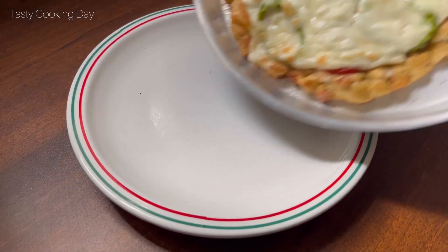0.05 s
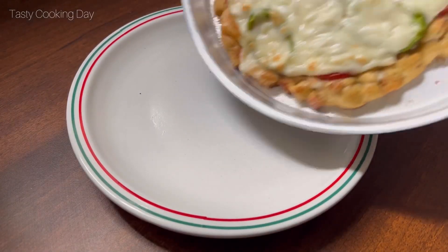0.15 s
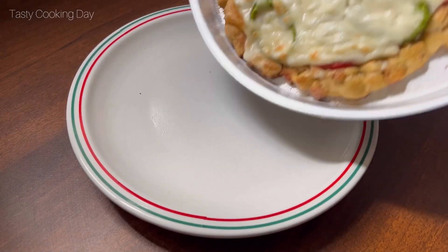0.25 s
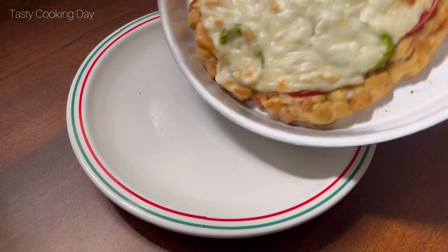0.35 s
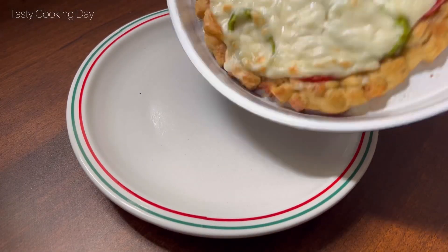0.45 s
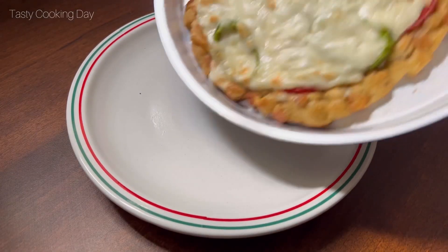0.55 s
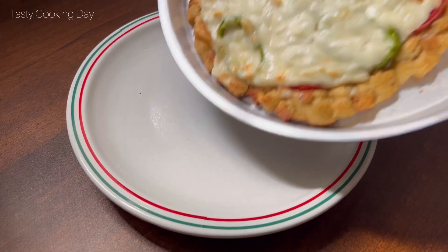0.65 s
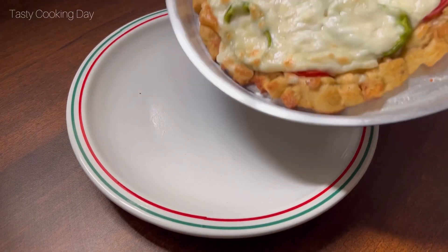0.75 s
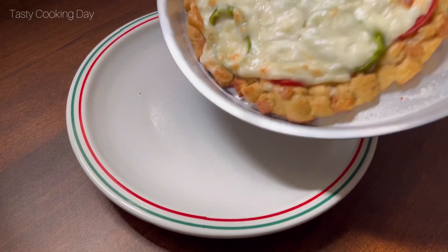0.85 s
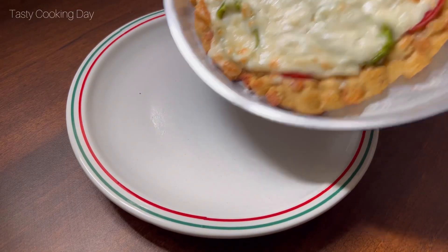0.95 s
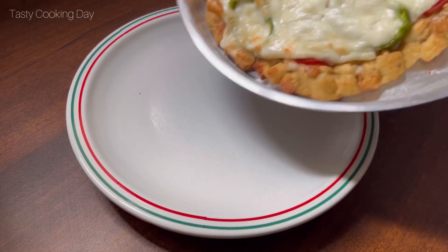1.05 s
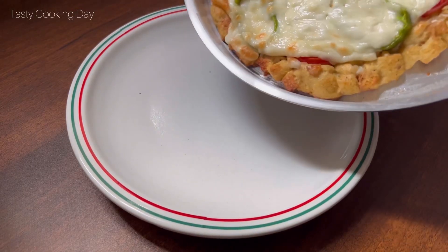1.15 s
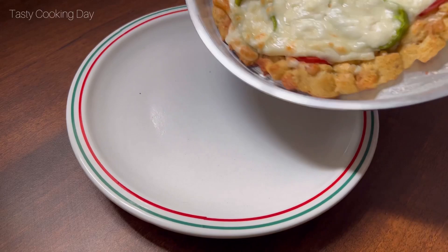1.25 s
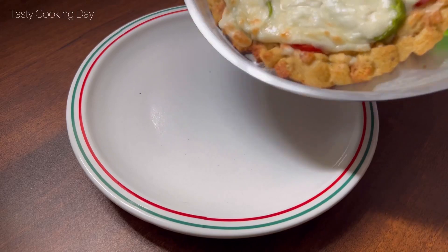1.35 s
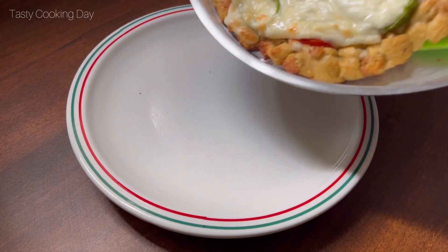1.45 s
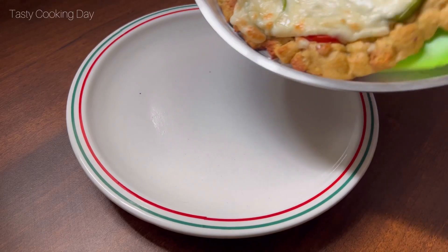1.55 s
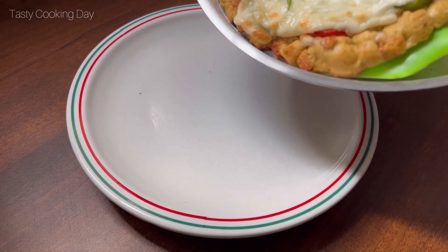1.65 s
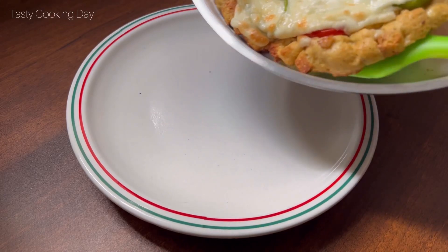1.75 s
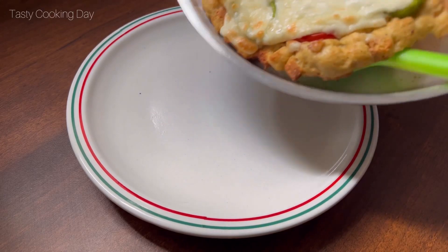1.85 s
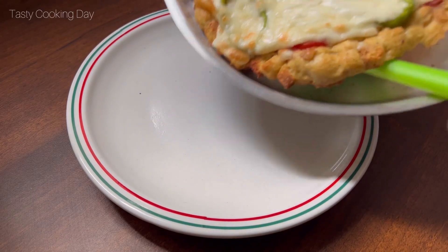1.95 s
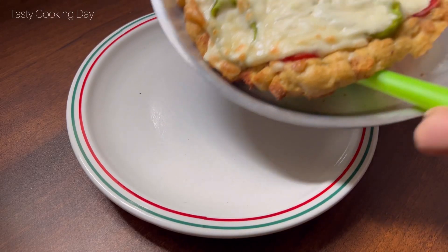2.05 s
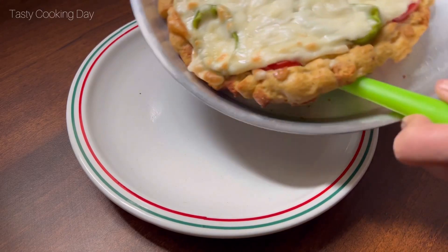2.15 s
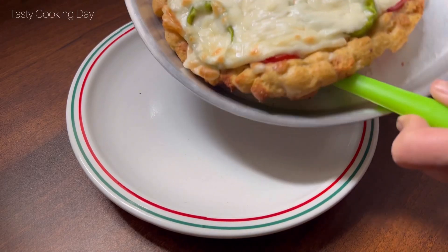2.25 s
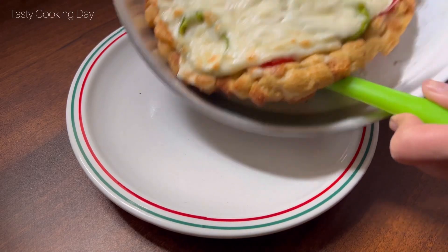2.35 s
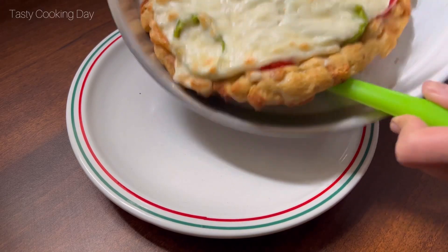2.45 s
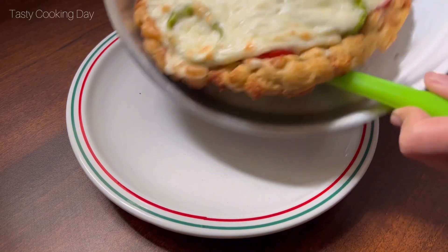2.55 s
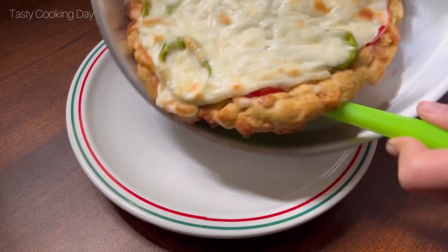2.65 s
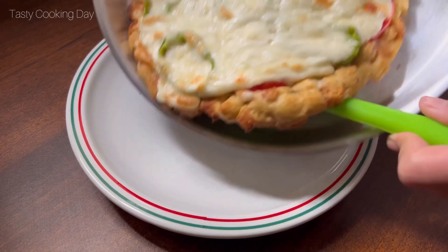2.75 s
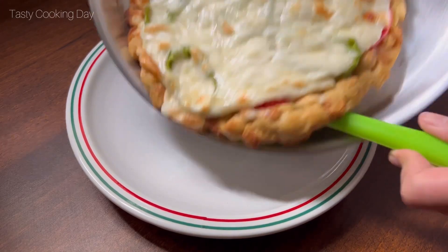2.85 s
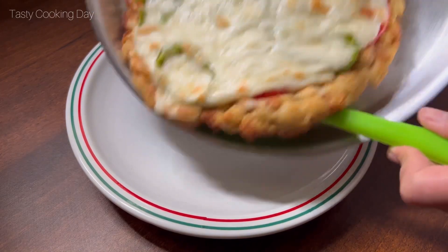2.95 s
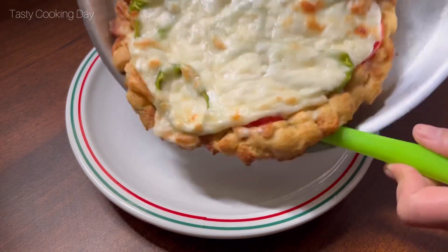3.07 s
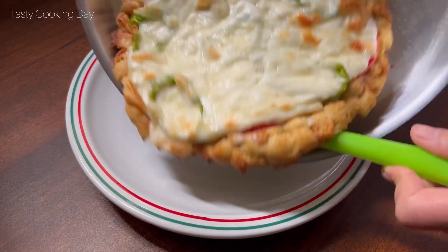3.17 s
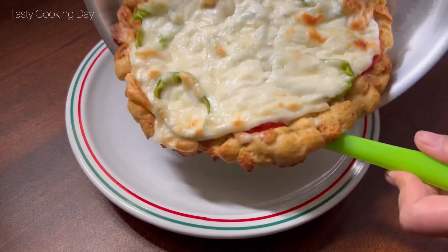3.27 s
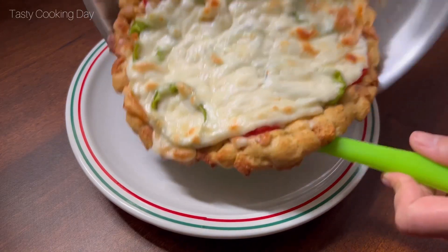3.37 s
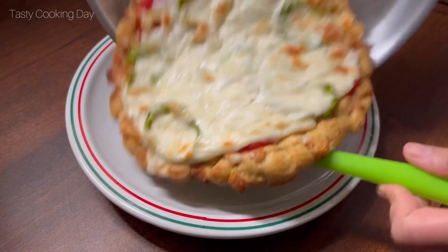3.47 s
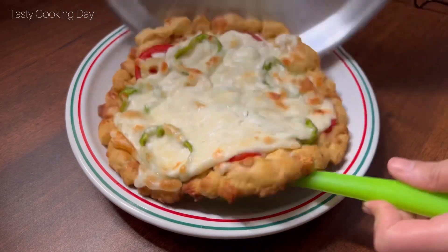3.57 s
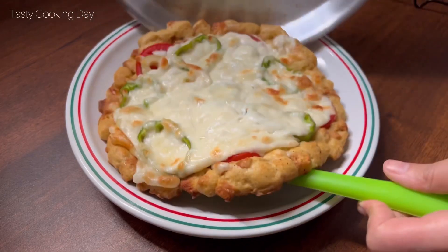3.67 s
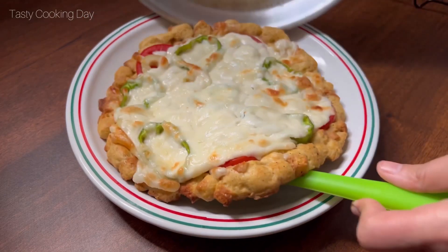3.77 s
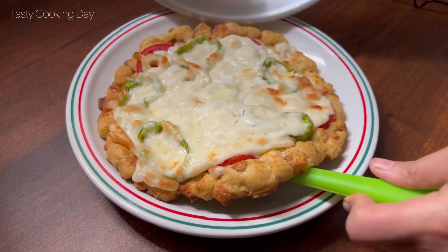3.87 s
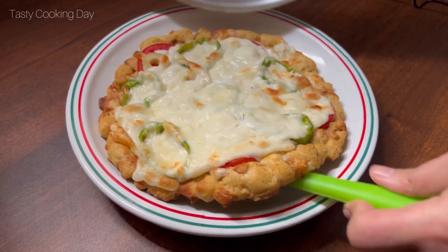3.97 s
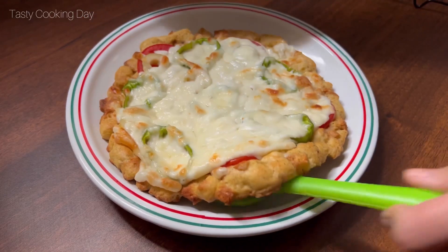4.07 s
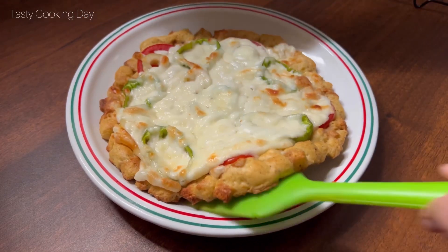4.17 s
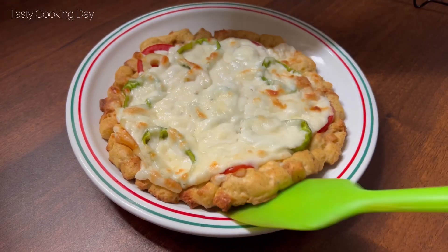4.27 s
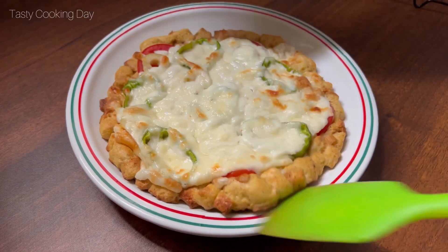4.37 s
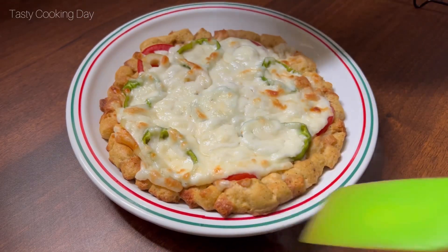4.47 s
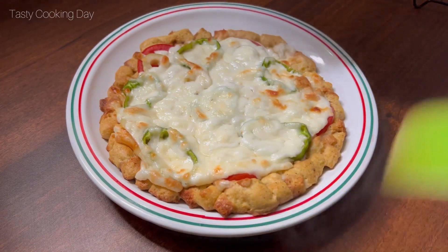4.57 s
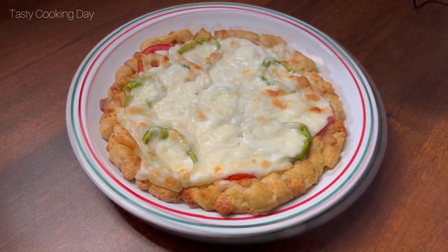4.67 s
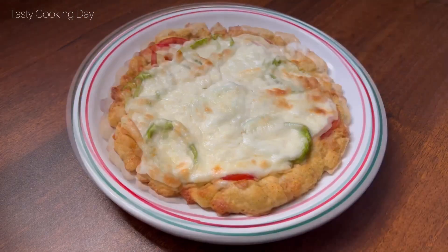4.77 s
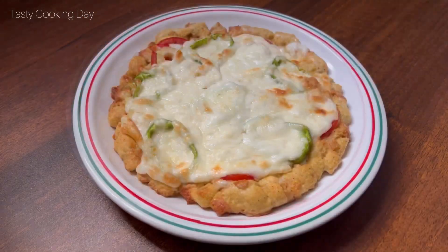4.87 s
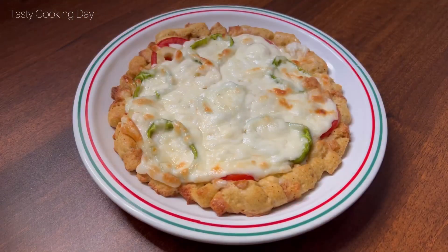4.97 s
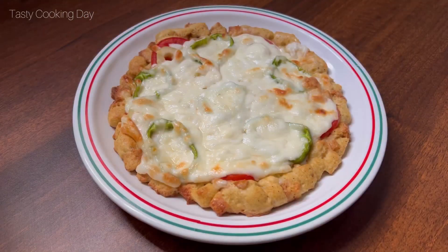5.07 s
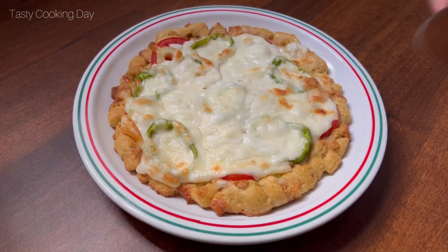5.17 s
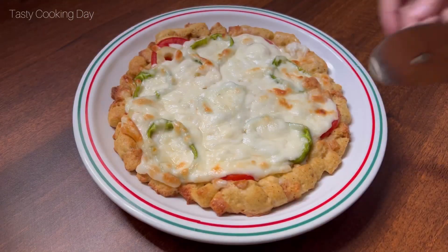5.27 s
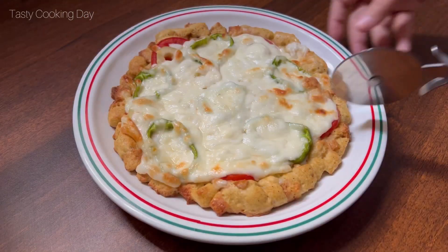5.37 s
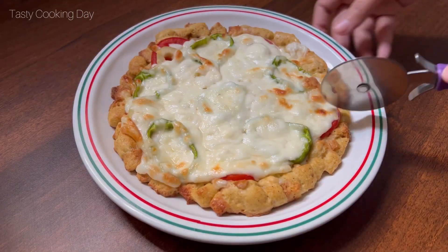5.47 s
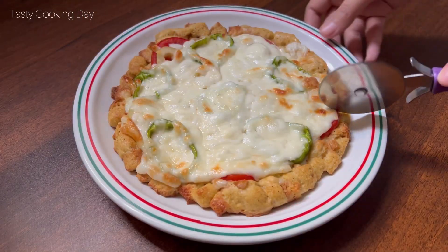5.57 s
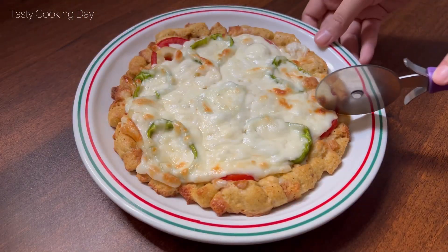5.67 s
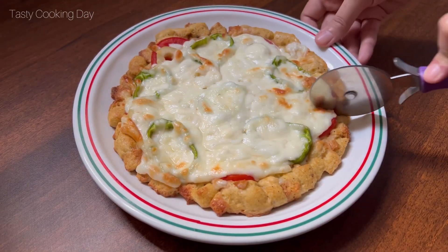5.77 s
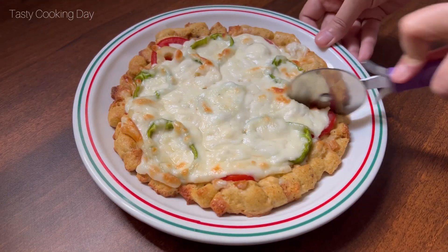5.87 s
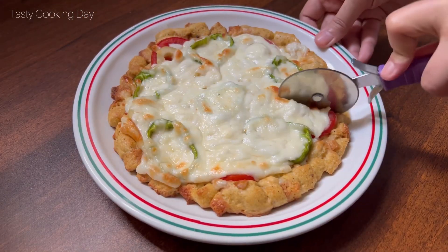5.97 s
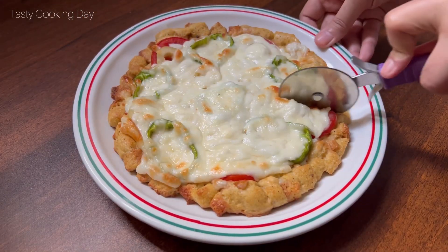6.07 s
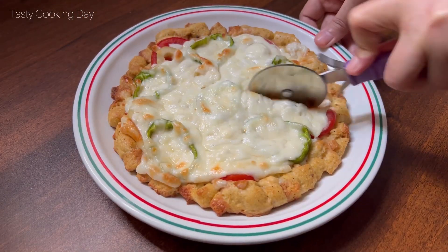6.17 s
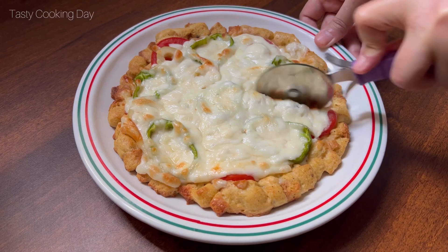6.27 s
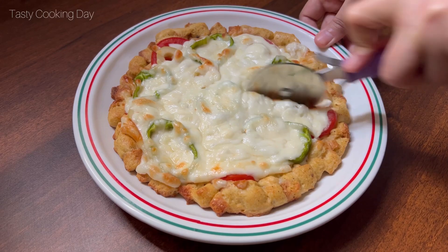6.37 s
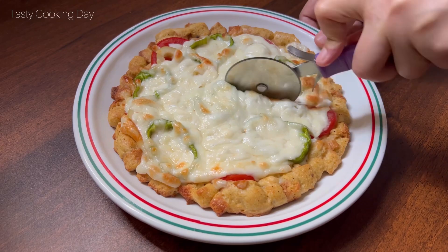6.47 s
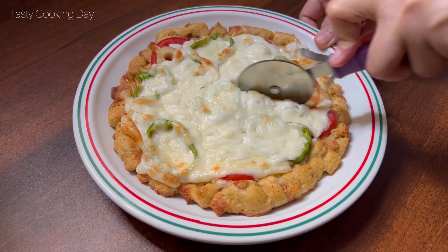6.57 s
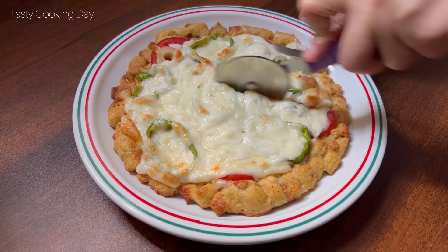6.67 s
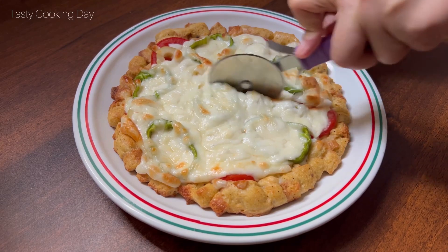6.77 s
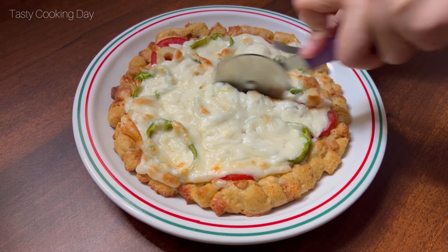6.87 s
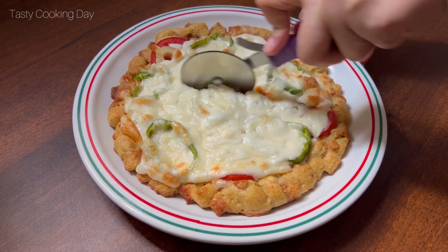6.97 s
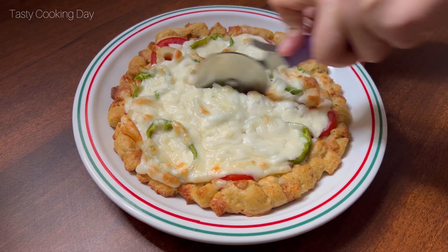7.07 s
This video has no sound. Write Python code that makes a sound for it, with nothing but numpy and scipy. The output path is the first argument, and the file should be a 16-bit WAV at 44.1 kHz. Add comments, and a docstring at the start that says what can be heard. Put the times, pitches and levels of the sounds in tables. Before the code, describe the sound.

A crusty pizza rasps across a metal pan, drops with a loud ceramic clack onto a plate, then a steel cutter wheel clinks and crunches through crust.

```python
"""A small, quiet kitchen, with a stereo microphone close to a wooden table.
First a spatula coaxes a pizza off a metal pan: rubbing noise rasps through the pan's resonances.
The pizza slides faster and faster and drops on a ceramic plate, whose damped modes ring as it rocks on the table.
The spatula is pulled out and the pan's edge chafes; then a cutter wheel is nudged, jiggles and taps the plate,
ringing in steel modes, and at last crunches through the crust in short pushes of filtered, grainy noise."""
import sys
import numpy as np
from scipy import signal
from scipy.fft import rfft, irfft, next_fast_len
from scipy.io import wavfile
from scipy.ndimage import uniform_filter1d

SR = 44100
rng = np.random.default_rng(int(sys.argv[2]) if len(sys.argv) > 2 else 0)


def transcribe(signal):
    """Save signal, clipped to [-1, 1], as a 16-bit WAV file at the path in sys.argv[1]."""
    frames = np.atleast_2d(signal).T
    limited = np.clip(frames, -1, 1)
    pcm = np.round(limited * 32767).astype(np.int16)
    wavfile.write(sys.argv[1], SR, pcm)


N = 313992
T = np.arange(N) / SR


def undb(db):
    """Decibels to gain."""
    return 10 ** (np.asarray(db) / 20)


def unit(x):
    """Scale to rms 1."""
    return x / np.sqrt(np.mean(x ** 2))


def crest(x):
    """Scale so that the loudest 2 ms have the rms of a sine of amplitude 1."""
    return x / np.sqrt(2 * uniform_filter1d(x ** 2, size=88).max())


def along(points, hz):
    """Read (f/Hz, value) points on a log-frequency axis."""
    f, value = np.transpose(points)
    return np.interp(np.log(np.maximum(hz, 1)), np.log(f), value)


def colour(x, points):
    """Causal, minimum-phase filter with the given (f/Hz, level/dB) response."""
    size = 2 * next_fast_len(len(x) // 2 + 2048)
    response = undb(along(points, np.fft.rfftfreq(size, 1 / SR)))
    # folding the cepstrum onto positive time makes the filter causal
    cepstrum = irfft(np.log(response))
    cepstrum[1:size // 2] *= 2
    cepstrum[size // 2 + 1:] = 0
    return irfft(rfft(x, size) * np.exp(rfft(cepstrum)))[:len(x)]


def lowpass(x, hz, order=4):
    """Take the treble away, as a soft contact does."""
    return signal.sosfilt(signal.butter(order, min(hz, .45 * SR), fs=SR, output="sos"), x)


def resonance(x, hz, width):
    """One band-pass resonance, gain 1 at its centre."""
    return signal.lfilter(*signal.iirpeak(hz, hz / width, fs=SR), x)


def fade(t60):
    """One second of exponential decay."""
    return np.exp(-np.log(1000) * T[:SR] / max(t60, 1e-4))


def burst(t60):
    """A decaying puff of noise."""
    return rng.standard_normal(SR) * fade(t60)


def ring(modes):
    """Damped modes (f/Hz, level/dB, t60/s), each starting at its own random phase."""
    out = 0
    for hz, db, t60 in modes:
        wave = np.sin(2 * np.pi * (hz * T[:SR] + rng.random()))
        out = out + undb(db) * fade(t60) * wave
    return out


def add(out, s, x):
    """Mix x into out from time s."""
    i = max(int(s * SR), 0)
    out[..., i:i + x.shape[-1]] += x[..., :N - i]


def during(start, end, ramp):
    """Gain that is 1 from start to end, with a ramp (s) before and after."""
    return np.clip(1 + np.minimum(T - start, end - T) / ramp, 0, 1)


def flutter(hz, depth_db):
    """Gain that wanders at random as the contact grips and gives."""
    return undb(depth_db * unit(lowpass(rng.standard_normal(N), hz, order=2)))


def grains(rate, spread_db, smooth):
    """Tiny fractures of very unequal size over a bed of finer friction."""
    hit = rng.random(N) < rate / SR
    size = undb(spread_db * np.minimum(rng.exponential(size=N), 4))
    fractures = unit(hit * size * rng.standard_normal(N))
    return unit(fractures + smooth * rng.standard_normal(N))


def strokes(table, column, rise, release, lead=0., after_db=-60, after_s=0.044):
    """Gain of pushes: short ones catch abruptly, long ones swell and ebb; each drops off, then creeps to rest."""
    slow_s, ease_s = 0.053, .014
    gain = np.zeros(N)
    t = T[:SR]
    for row in table:
        gentle = min((row[1] / slow_s) ** 2, .8)  # longer strokes are gentler
        early = lead + gentle * ease_s
        length = row[1] + early
        swell = np.minimum(t / (rise * row[1] + early), 1)
        arch = 1 + gentle * (1.3 * np.sin(np.pi * np.minimum(t / length, 1)) - 1)
        since = np.maximum(t - length, 0)
        drop = np.exp(-since / (release * (1 + 2 * gentle)))
        creep = undb(after_db) * np.exp(-since / after_s)
        add(gain, row[0] - early, undb(row[column]) * swell * arch * np.maximum(drop, creep))
    return gain


# room tone spectrum: f/Hz, relative level/dB
ROOM_TONE = [(13, -34), (22, -17.5), (53, 2.5), (66, -11.5), (76, -19), (200, -21), (249, -37.5),
             (432, -33.5), (636, -50.5), (1910, -40.5), (2980, -51.5), (3610, -49), (4630, -48.5),
             (7390, -46), (16000, -68)]
# spectrum of the dull rumble in the table: f/Hz, relative level/dB
TABLE_RUMBLE = [(30, -26), (55, -2.5), (100, 7.5), (200, 2), (380, -8.5), (650, -18), (1200, -29.5),
                (2000, -22), (4000, -37.5), (12000, -63)]
# hands at work, first on pan and spatula, then on plate and cutter: start t/s, end t/s, rumble level/dB
HANDS_AT_WORK = [(0, 4.394, -69), (5.1, 6.5, -73.5)]
ROLL_S = 6.19  # s, from here the wheel rolls steadily


def background(tone_db=-68, roll_db=-64, shake_db=-28.5, shake_t60=.6, tip_db=-59.5):
    """Low room tone as shaped noise; dull rumble of hands, shaken table and rolling wheel; a tipping pan's low swell."""
    tone = undb(tone_db) * unit(colour(rng.standard_normal(N), ROOM_TONE))
    unsteady = flutter(6, depth_db=1.5)
    rumble = unit(unsteady * colour(rng.standard_normal(N), TABLE_RUMBLE))
    gain = undb(roll_db) * during(ROLL_S, T[-1], ramp=0.55)
    for start, end, db in HANDS_AT_WORK:
        gain += undb(db) * during(start, end, ramp=0.46)
    # each blow on the plate shakes the table, in step with the knock of the foot
    for s, _, _, foot_db, _, _ in PLATE_BLOWS:
        add(gain, s, undb(foot_db + shake_db) * fade(shake_t60))
    tipping = during(3.22, 3.55, ramp=.12)
    swell = unit(resonance(lowpass(rng.standard_normal(N), 75), 46, 25))
    return tone + gain * rumble + undb(tip_db) * tipping * swell


# the cutter's loose wheel jiggles as it is picked up: t/s, chink level/dB
WHEEL_JIGGLES = [(4.943, -48.5), (4.953, -62)]


def jiggle(tail_db=-16):
    """The wheel chinks on its rivet: a short bright noise burst with a thin steel after-ring."""
    out = np.zeros(N)
    chink_spectrum = [(1500, -26.5), (3000, 0.0), (6000, 5), (9000, -1.0), (15000, -3.0)]
    after_spectrum = [(1500, -24.0), (2800, -11.0), (4500, -4.0), (6000, -3), (8000, -6.5), (15000, -24.5)]
    for s, db in WHEEL_JIGGLES:
        chink = colour(burst(0.028), chink_spectrum)
        after = colour(burst(0.39), after_spectrum)
        add(out, s, undb(db) * (crest(chink) + undb(tail_db) * crest(after)))
    return out


# crumbs snapping and small ticks: t/s, level/dB before the common gain, brightest f/Hz
CRUMB_TICKS = [(1.8486, -47.5, 12400), (1.938, -59, 15600), (2.578, -47, 5600), (2.64, -54.5, 5170),
               (3.018, -38, 7850), (3.074, -41, 1270), (3.3632, -40, 3800), (3.867, -35.5, 11510),
               (4.1705, -49, 10500), (5.502, -62.5, 2200), (5.7623, -53.5, 8810), (5.789, -55, 7000),
               (6.035, -63.5, 2800), (6.05, -65, 4500), (6.265, -53.5, 11700), (6.442, -57, 2570),
               (6.8, -46, 12300), (6.877, -56, 12100), (6.898, -50, 1890), (6.96, -49, 2100),
               (7.0787, -49.5, 12600)]


def ticks(gain_db=-5, width=0.21):
    """Single dry crumbs snap, each a puff of noise through one broad resonance."""
    out = np.zeros(N)
    for s, db, hz in CRUMB_TICKS:
        snap = resonance(burst(0.014), hz, min(width * hz, 6000))
        add(out, s, undb(db + gain_db) * crest(snap))
    return out


# soft knocks through pan, plate and table: t/s, level/dB before the common gain, f/Hz, t60/s,
# harder edge's relative level/dB, table's low answer's relative level/dB
SOFT_KNOCKS = [(0.451, -39.5, 312, 0.053, -14, -7), (.652, -46, 317, 0.041, -34, -12),
               (1.272, -54, 224, 0.066, -40, -12), (2.297, -47, 267, 0.061, -15, -8),
               (2.473, -28, 275, 0.018, -22, -10.5), (3.546, -31.5, 287.3, 0.13, -14.5, -20),
               (3.762, -32.5, 260, 0.055, -15.5, -21), (3.876, -40, 263, .16, -14, -21.5),
               (3.894, -39.5, 262.7, 0.075, -16.5, -11), (5.583, -40.5, 449, 0.08, -16.5, -15),
               (5.862, -48, 223, 0.084, -15, -17), (6.113, -35, 202.3, 0.19, -19, -12),
               (6.371, -39.5, 206, 0.086, -20, -7), (6.9, -51, 500, 0.053, -4, -21)]


def thuds(gain_db=-1, width=0.66, edge_hz=1300, table_hz=80, table_lag=0.0073, table_t60=.06, soft_t60=0.0098):
    """Padded knocks: a broad, heavily damped low resonance with a brief harder edge; the table answers low and late."""
    out = np.zeros(N)
    onset = 1 - fade(soft_t60)
    answer = crest(np.sin(2 * np.pi * table_hz * T[:SR]) * fade(table_t60))
    for s, db, hz, t60, edge_db, table_db in SOFT_KNOCKS:
        body = resonance(burst(t60) * onset, hz, width * hz)
        body = resonance(body, hz, width * hz)
        edge = lowpass(burst(0.014) * onset, edge_hz, order=2)
        add(out, s, undb(db + gain_db) * (crest(body) + undb(edge_db) * crest(edge)))
        add(out, s + table_lag, undb(db + gain_db + table_db) * answer)
    return out


# the pan's edge chafes as it is drawn away: t/s, length/s, level/dB
EDGE_CHAFES = [(3.71, 0.033, -51.5), (3.79, 0.0092, -52.5), (3.855, 0.036, -48)]
# modes of the emptied pan, free to ring: f/Hz, relative level/dB
EMPTY_PAN_MODES = [(5211, 0), (5846, -9), (6142, -10), (7402, -14), (8027, -16)]


def free_pan(width_hz=22):
    """Without the pizza's weight each chafe sets the pan singing on a few high, wavering modes."""
    rub = rng.standard_normal(N)
    tone = np.zeros(N)
    for hz, db in EMPTY_PAN_MODES:
        once = resonance(rub, hz, 2 * width_hz)
        tone += undb(db) * resonance(once, hz, 2 * width_hz)
    return unit(tone) * strokes(EDGE_CHAFES, 2, rise=0.55, release=.016, after_db=-11.5, after_s=0.054)


SLIDE_S, LAND_S, START_SPEED = 3.36, 3.56, 0.1  # s, s, share of full speed


def slide_speed(stop_s=0.041):
    """The pizza breaks free, speeds up evenly down the tilted pan and is stopped by the plate."""
    speed = np.interp(T, [SLIDE_S, LAND_S], [START_SPEED, 1], left=0)
    return speed * np.exp(-np.maximum(T - LAND_S, 0) / stop_s)


# crust and spatula rasping on the pan, from brief catches to slow drags:
# t/s, length/s, body level/dB, grit level/dB before the common gains
PAN_RASPS = [(.003, 0.021, -60, -59.5), (.14, 0.086, -63, -67), (.335, 0.063, -62, -70),
             (.97, 0.13, -78.5, -86), (1.275, 0.0031, -64, -68.5), (1.438, 0.031, -67, -71),
             (1.493, 0.009, -60.5, -63), (1.522, 0.0097, -59, -64.5), (1.4, 0.64, -78, -86.5),
             (1.635, 0.015, -63.5, -52.5), (1.846, 0.0042, -54.5, -60), (2.218, 0.088, -63.5, -65),
             (2.333, 0.016, -66, -61.5), (2.483, 0.021, -60, -54), (2.575, 0.0079, -58.5, -64.5),
             (2.661, 0.0058, -62, -65), (2.695, 0.0055, -65.5, -76), (2.865, 0.029, -59, -46),
             (2.995, .008, -56.5, -78), (3.016, 0.033, -58, -51.5), (3.073, 0.0052, -54, -66.5),
             (3.16, 0.09, -66, -60.5), (3.3, .07, -64.5, -58.5), (3.359, 0.022, -58.5, -50),
             (3.6, 0.28, -59.5, -59), (3.864, 0.017, -59.5, -49), (3.97, 0.34, -77, -86.5)]
# pan resonances that colour all rubbing: f/Hz, width/Hz, relative level/dB
PAN_RESONANCES = [(2600, 30, -8), (2832, 30, -9), (3176, 35, -1), (3811, 35, 0), (3951, 30, -1),
                  (4619, 35, -7), (4753, 35, -8), (5286, 60, 0), (5949, 50, -6), (6444, 40, -7),
                  (6740, 35, -4), (9114, 80, -4)]
# spectrum of the bright rubbing: f/Hz, relative level/dB
GRIT_SPECTRUM = [(1200, -27.5), (2600, 1), (5000, 1), (8000, 1), (15500, -7.5)]
# spectrum of the dull rubbing: f/Hz, relative level/dB
BODY_SPECTRUM = [(150, -14.5), (350, -1), (600, -3.5), (1400, -3.5), (2300, -8), (4000, -17.5),
                 (9000, -41.5)]


def scraping(grit_db=-3, dense_db=-3, strong_db=8, slide_grit_db=-46, slide_body_db=-48.5):
    """The crust catches and slips on the pan; each slip rings the thin metal."""
    speed = slide_speed()
    # after each rasp the crust creeps on
    creep = dict(after_db=-14, after_s=0.064)
    grit_gain = undb(grit_db) * strokes(PAN_RASPS, -1, rise=0.24, release=0.0074, lead=0.00033, **creep)
    grit_gain += undb(slide_grit_db) * speed
    body_gain = strokes(PAN_RASPS, -2, rise=0.32, release=.006, lead=.001, **creep)
    body_gain += undb(slide_body_db) * speed
    grip = flutter(70, depth_db=1.8) * flutter(12, depth_db=1.2)
    slips = colour(grains(rate=5000, spread_db=2.0, smooth=0.2), GRIT_SPECTRUM)
    slips = unit(grip * slips) * grit_gain
    # a few strong modes stand over a thicket of weak, high ones
    weak_hz = np.r_[4300:6900:260, 6900:16000:150]
    thicket = ring([(hz + rng.uniform(-70, 70), 0, .07) for hz in weak_hz])
    thicket = signal.fftconvolve(slips, thicket / np.sqrt(np.sum(thicket ** 2)))[:N]
    strong = sum(undb(db) * resonance(slips, hz, width) for hz, width, db in PAN_RESONANCES)
    body = colour(grains(rate=630, spread_db=1.0, smooth=.5), BODY_SPECTRUM)
    body = unit(grip * body) * body_gain
    return .5 * slips + undb(dense_db) * thicket + undb(strong_db) * strong + body


# pushes of the wheel through the crust:
# t/s, length/s, dough level/dB before its common gain, crunch level/dB, crackle level/dB
WHEEL_PUSHES = [(5.84, 0.02, -58, -80, -54.5), (6.11, 0.052, -45.5, -67, -63),
                (6.235, 0.043, -67.5, -78.5, -79.5), (6.36, 0.099, -53.5, -62.5, -60.5),
                (6.505, 0.066, -65, -70, -78.5), (6.622, 0.077, -55, -60.5, -62.5),
                (6.775, 0.06, -78.5, -69.5, -73), (6.885, 0.037, -57.5, -53, -68.5),
                (6.925, 0.05, -54.5, -58.5, -71), (7.018, 0.075, -58, -61.5, -65.5)]
# spectrum of squashed dough: f/Hz, relative level/dB
DOUGH_SPECTRUM = [(80, 6), (250, -9.5), (500, 1.5), (750, -15), (1100, -31.5), (3000, -40.5)]
# spectrum of the crushed base: f/Hz, relative level/dB
CRUNCH_SPECTRUM = [(700, -24), (1200, -24), (1600, 2.5), (2100, -0.5), (2600, -15), (4000, -19),
                   (6000, -23.5), (9000, -25.5), (14000, -60.5)]
# spectrum of the splitting skin: f/Hz, relative level/dB
CRACKLE_SPECTRUM = [(1500, 2.5), (3000, 3.5), (4800, 0.5), (6500, -2), (9000, -7.5), (12500, -1),
                    (15500, 0.5)]
# resonances of the cutter's wheel and fork that the crunch passes through: f/Hz, width/Hz, relative level/dB
FORK_RESONANCES = [(1780, 310, 0), (2690, 115, 12.5), (3375, 73, 16), (4800, 88, 16)]


def cutting(dough_db=-1, roll_crunch_db=-87.5):
    """The wheel squashes dough, crushes the baked base and splits its dry skin."""
    give = flutter(60, depth_db=2.5)
    dough = unit(give * colour(grains(rate=640, spread_db=4, smooth=0.38), DOUGH_SPECTRUM))
    dough *= strokes(WHEEL_PUSHES, 2, rise=0.074, release=0.012, lead=0.0044, after_db=-14, after_s=0.049)
    crunch = colour(grains(rate=700, spread_db=2.8, smooth=.3), CRUNCH_SPECTRUM)
    fork = sum(undb(db) * resonance(crunch, hz, width) for hz, width, db in FORK_RESONANCES)
    crunch_gain = strokes(WHEEL_PUSHES, -2, rise=0.19, release=0.0069, lead=0.015)
    # the steady roll adds a faint crunch between pushes
    crunch_gain += undb(roll_crunch_db) * during(ROLL_S, T[-1], ramp=0.054)
    crunch = unit(give * (crunch + fork)) * crunch_gain
    splits = grains(rate=500, spread_db=2.2, smooth=.7)
    crackle = unit(give * colour(splits, CRACKLE_SPECTRUM))
    crackle *= strokes(WHEEL_PUSHES, -1, rise=0.85, release=0.011, lead=0.012, after_db=-21.5, after_s=0.093)
    return undb(dough_db) * dough + crunch + crackle


# the wheel is nudged, then touches the plate:
# t/s, ring level/dB, contact click level/dB, lowest f/Hz that rings fully
WHEEL_TAPS = [(4.4, -52.5, -57.5, 7130), (5.5864, -21.5, -28, 1500)]
# modes of the steel wheel: f/Hz, relative level/dB, t60/s, left minus right level/dB
WHEEL_MODES = [(2772, 0, .06, 12), (2776, -27, .6, 4), (2803, -31, .35, 2), (2860, -17, .05, 4),
               (1658, -32, .33, 0), (1935, -33, .3, 0), (4030, -23, .15, 3), (4130, -24, .15, 3),
               (4764, -36, .2, 0), (5580, -10, .07, 4), (5602, -23, .29, 0), (5574, -30, .25, 0),
               (5954, -33, .18, 0), (7359, -43, .4, 0), (9335, -26, .13, -2), (11530, -31, .12, 0),
               (13900, -39, .09, 4)]
# spectrum of the contact click: f/Hz, relative level/dB
CLICK_SPECTRUM = [(200, 5.5), (450, 4.5), (1000, -7), (1800, 0.5), (3000, -4), (5000, -9), (7000, -20),
                  (12000, -25), (16000, -33.5)]


def cutter(build_t60=0.0039):
    """The steel disc rings, at once damped by the crust; its modes beam unevenly to left and right."""
    tone, click = np.zeros((2, N)), np.zeros(N)
    for s, ring_db, click_db, low_hz in WHEEL_TAPS:
        sides = np.zeros((2, SR))
        for hz, db, t60, lean_db in WHEEL_MODES:
            left_right = undb(np.array([[lean_db], [-lean_db]]) / 2)
            sides += ring([(hz, db, t60)]) * min(hz / low_hz, 1) ** 4 * left_right
        add(tone, s, undb(ring_db) * sides * (1 - fade(build_t60)))
        contact = colour(burst(0.034) + undb(-25.0) * burst(0.78), CLICK_SPECTRUM)
        add(click, s, undb(click_db) * crest(contact))
    return tone + ports(click)


# the plate is struck and rocks: t/s, ring level/dB, clack level/dB, foot knock level/dB,
# table boom level/dB, contact cut-off f/Hz
PLATE_BLOWS = [(3.5615, -4, -14.5, -35.5, -25.5, 14700), (3.5715, -18, -27, -26, -39.5, 9100),
               (3.763, -12, -40.5, -27, -46.5, 3280), (3.896, -25, -51, -45, -43.5, 3000)]
# modes of the ceramic plate: f/Hz, relative level/dB, t60/s
PLATE_MODES = [(269, -21, .32), (406, -39, .35), (572, -42, .34), (654, -37, .32), (758, -42, .48),
               (1035, -44, .25), (1072, -42, .3), (1405, -48, .55), (1487, -32, .28), (1566, -39, .38),
               (1642, -36, .42), (1911, -37, .26), (2184, -34, .24), (2364, -45, .4), (2726, -43, .38),
               (2885, -47, .42), (3461, -40, .22), (3973, -46, .26), (4102, -44, .22), (4583, -41, .19),
               (5523, -49, .24), (6212, -50, .24), (7131, -40, .19), (7706, -43, .2), (8423, -41, .14)]
# spectrum of the contact on the plate's rim: f/Hz, relative level/dB
RIM_SPECTRUM = [(100, -19), (250, 4), (340, -20), (650, 2.5), (850, -13), (1060, 1.5), (1270, -13),
                (1540, 9), (1820, -5.5), (2150, 8), (2480, -13), (3400, -10), (5500, -20), (8400, -13),
                (15500, -13.5)]
# spectrum of the plate's foot knocking on the table: f/Hz, relative level/dB
FOOT_SPECTRUM = [(100, -11.5), (250, -1), (380, -8.5), (640, 2), (900, -17.5), (1300, -16.5), (1620, -8),
                 (1900, -14), (2450, -10), (2740, 4.5), (3000, -12), (3400, -9), (4200, -22.5), (9000, -44)]
# modes of the table top: f/Hz, relative level/dB, t60/s
TABLE_MODES = [(55, 0, .55), (61, -5, .25), (87, 3, .3), (108, -6, .25), (165, -10, .25)]


def plate(chatter_db=-15, boom_lag=0.003, choked_db=6, choked_t60=0.042, choked_tilt_db=4.0):
    """Each blow clacks, chatters briefly and rings the plate; the table top answers a moment later."""
    out = np.zeros(N)
    # most of the high ringing is choked at once by the table and the pizza; the tilt is in dB per octave
    choked = [(hz, db + choked_db + choked_tilt_db * np.log2(hz / 2000), choked_t60)
              for hz, db, _ in PLATE_MODES if hz > 500]
    for s, ring_db, clack_db, foot_db, boom_db, hz in PLATE_BLOWS:
        clack = colour(burst(.035) + undb(chatter_db) * burst(0.11), RIM_SPECTRUM)
        add(out, s, undb(clack_db) * crest(lowpass(clack, hz, order=6)))
        add(out, s, undb(ring_db) * lowpass(ring(PLATE_MODES + choked), hz, order=6))
        knock = colour(burst(0.049) + undb(-17.5) * burst(0.3), FOOT_SPECTRUM)
        add(out, s, undb(foot_db) * crest(knock))
        boom = ring(TABLE_MODES) * (1 - fade(.05))
        add(out, s + boom_lag, undb(boom_db) * crest(boom))
    return out


# stereo spread of the microphone pair: f/Hz, side minus mid level/dB
PORT_WIDTH = [(60, -21.5), (150, -13.5), (500, -8.5), (1200, -4), (2500, -1), (5000, -2.5), (12000, -0.5)]
# balance of the microphone pair: f/Hz, left minus right gain/dB
PORT_LEAN = [(100, -1), (300, -2.2), (1300, 1.5), (4400, 4), (12000, -0.5)]


def ports(x, scatter=0.93):
    """Two microphone ports: near reflections give them a side signal of scattered phase, wider in the treble."""
    hz = np.fft.rfftfreq(N, 1 / SR)
    knots = np.arange(0, SR / 2, 90)
    turn = np.interp(hz, knots, np.pi / 2 + scatter * rng.standard_normal(len(knots)))
    side = undb(along(PORT_WIDTH, hz)) * np.exp(1j * turn)
    lean = undb(along(PORT_LEAN, hz) / 2)
    return irfft(rfft(x) * np.array([(1 + side) * lean, (1 - side) / lean]), N)


# kitchen reverberation: f/Hz, t60/s
KITCHEN_DECAY = [(100, 0.18), (400, 0.33), (2000, 0.2), (6000, 0.18), (14000, 0.12)]


def kitchen(x, wet_db=-13):
    """A short diffuse noise tail, its decay set by frequency; its long waves reach both ports alike."""
    hz, s, cells = signal.stft(rng.standard_normal((2, SR)), SR, nperseg=256)
    decay = np.exp(-np.log(1000) * s / along(KITCHEN_DECAY, hz)[:, None])
    diffuse = signal.istft(cells * decay, SR)[1][:, :SR]
    mid, side = diffuse * (1 - fade(0.066))
    side = colour(side, [(70, -23.5), (300, -3.5), (900, -5.0)])
    tail = np.array([mid + side, mid - side])
    tail = tail / np.sqrt(np.sum(tail ** 2) / 2)
    wet = signal.fftconvolve(x.mean(axis=0)[None], tail, axes=1)[:, :N]
    return x + undb(wet_db) * wet


def scene():
    """Everything happens on the table, close in front of the microphone."""
    handling = scraping() + free_pan() + thuds() + ticks() + plate() + jiggle() + cutting()
    return kitchen(ports(handling) + cutter()) + ports(background())


def record(dry, low_hz=36, top_hz=16000):
    """The recorder drops the deepest bass and cuts the top."""
    dry = signal.sosfilt(signal.butter(3, low_hz, "high", fs=SR, output="sos"), dry)
    return signal.sosfilt(signal.ellip(8, .2, 70, top_hz, fs=SR, output="sos"), dry)


dry = scene()
out = record(dry)
transcribe(out)
```